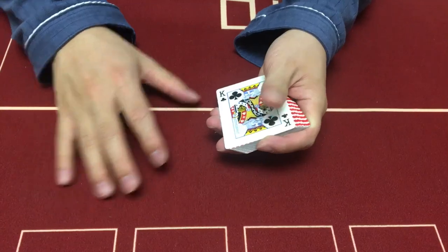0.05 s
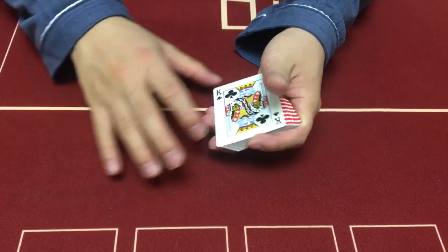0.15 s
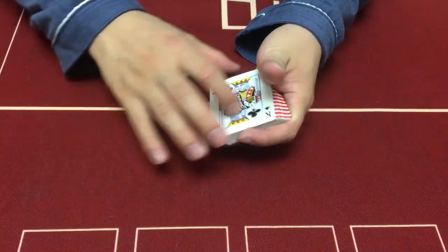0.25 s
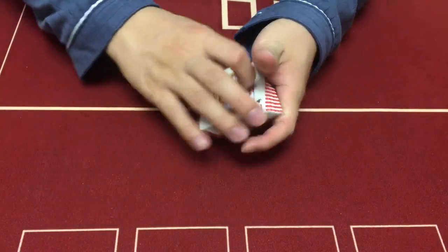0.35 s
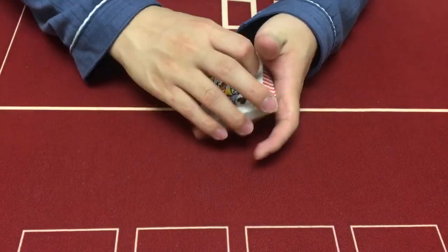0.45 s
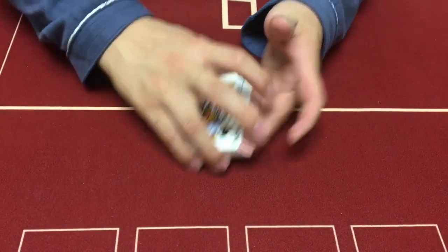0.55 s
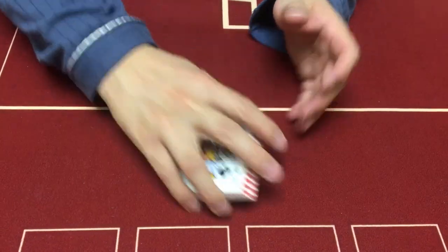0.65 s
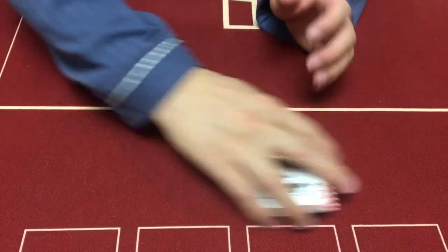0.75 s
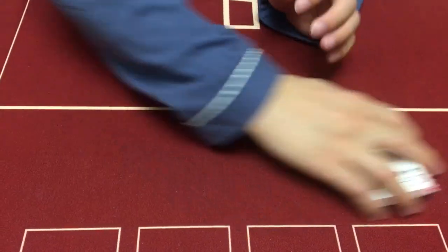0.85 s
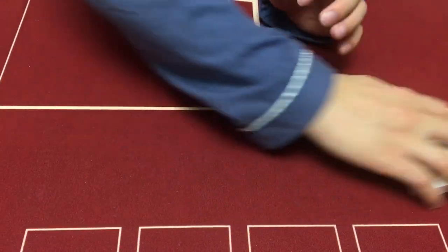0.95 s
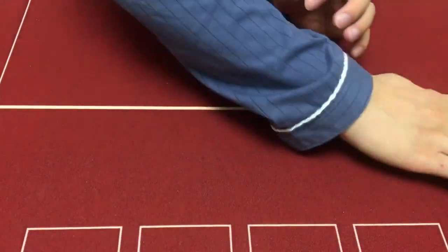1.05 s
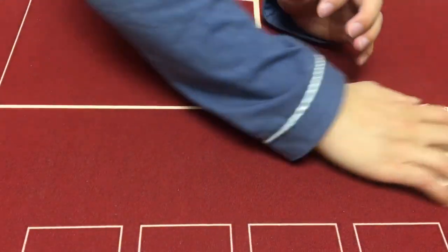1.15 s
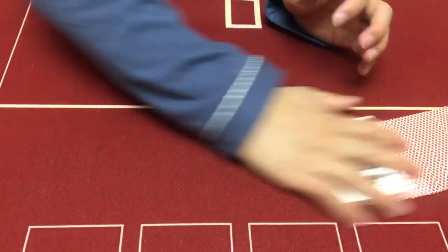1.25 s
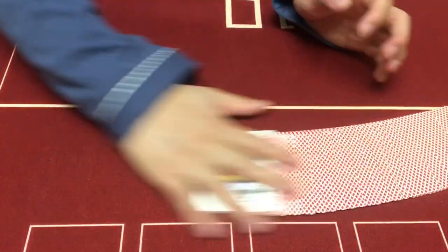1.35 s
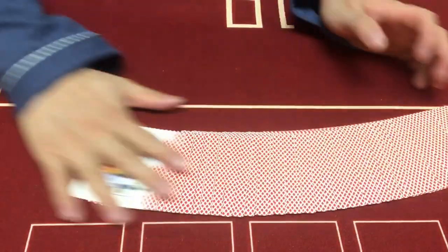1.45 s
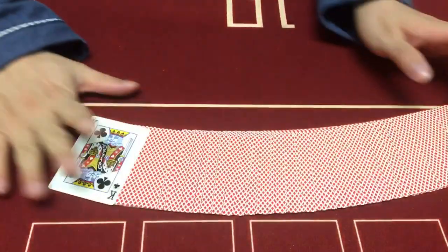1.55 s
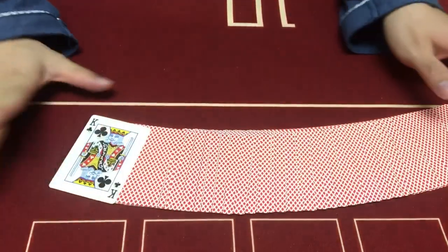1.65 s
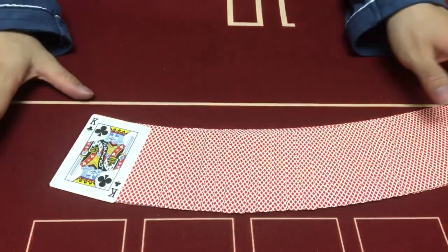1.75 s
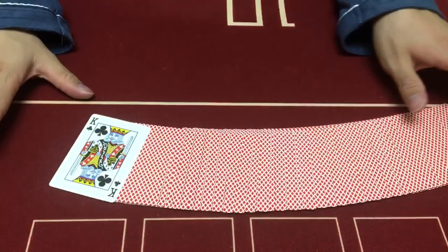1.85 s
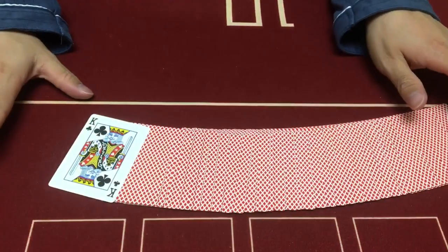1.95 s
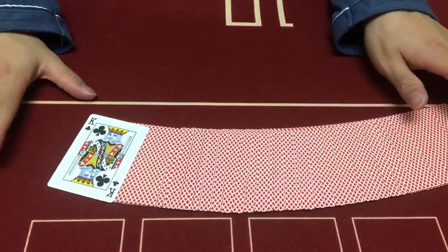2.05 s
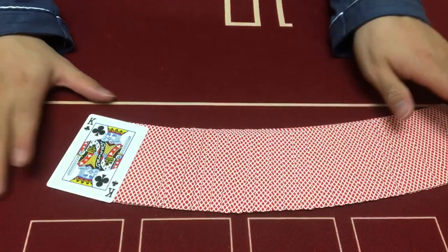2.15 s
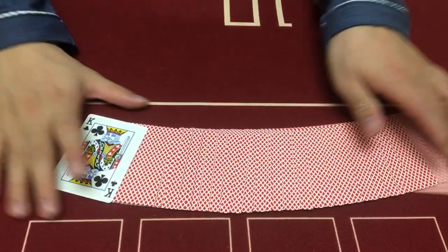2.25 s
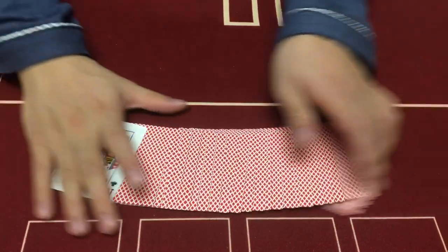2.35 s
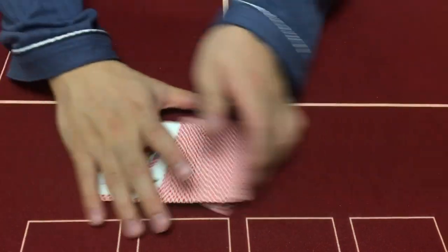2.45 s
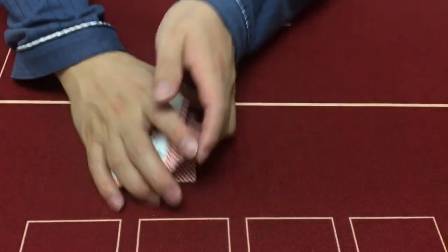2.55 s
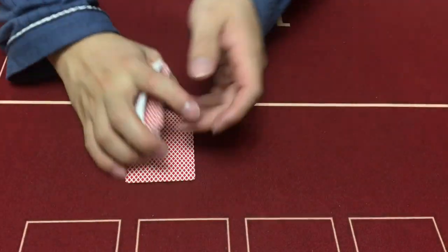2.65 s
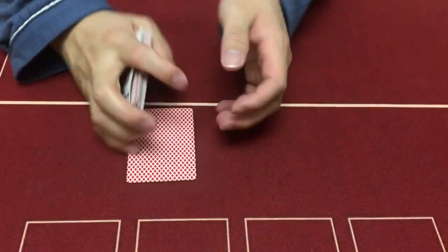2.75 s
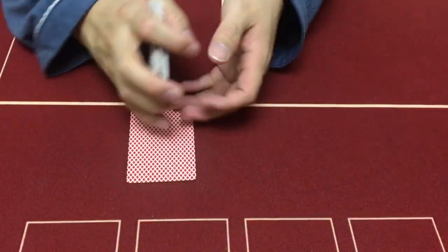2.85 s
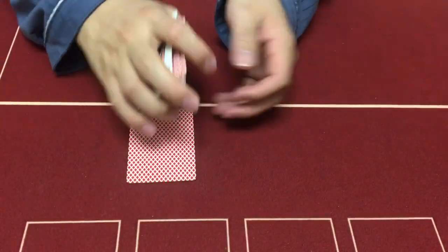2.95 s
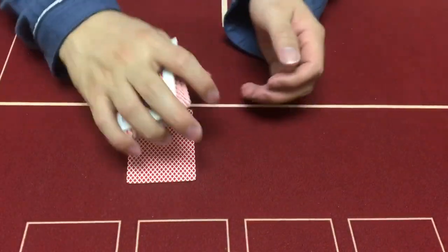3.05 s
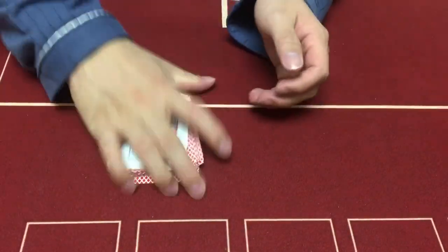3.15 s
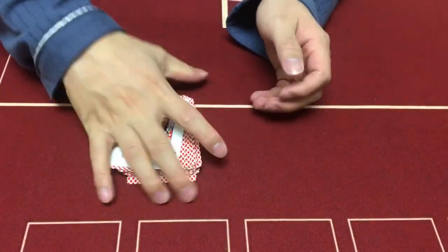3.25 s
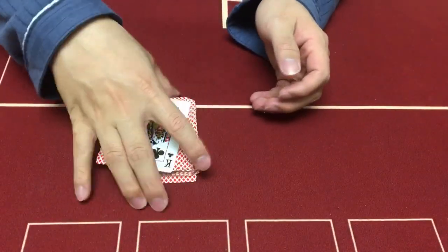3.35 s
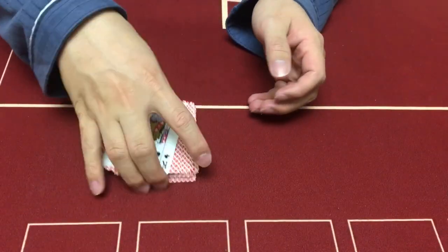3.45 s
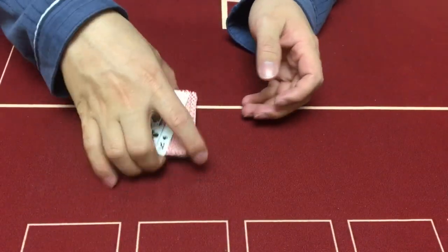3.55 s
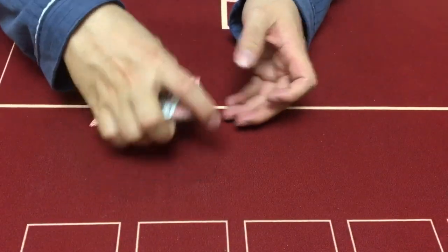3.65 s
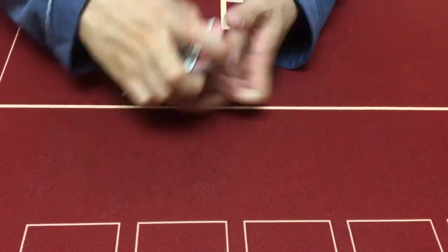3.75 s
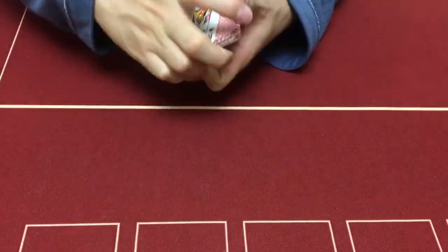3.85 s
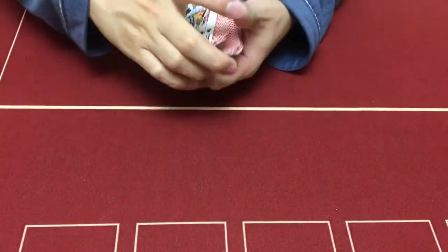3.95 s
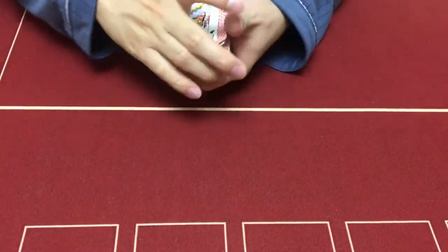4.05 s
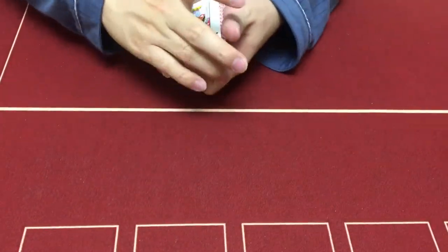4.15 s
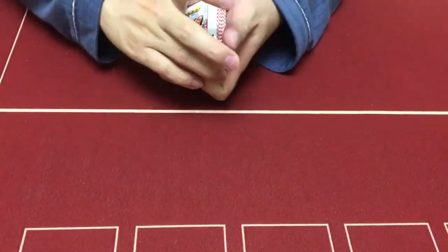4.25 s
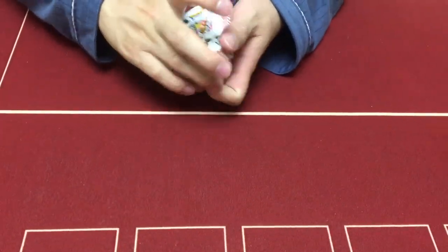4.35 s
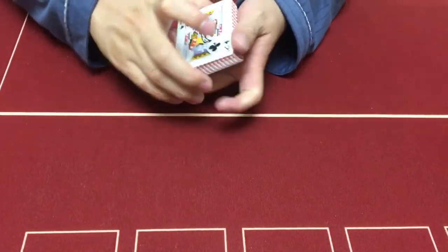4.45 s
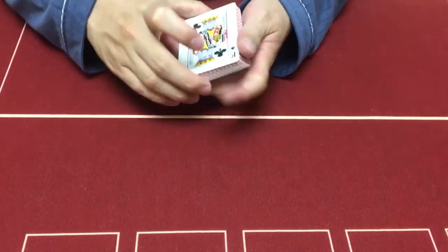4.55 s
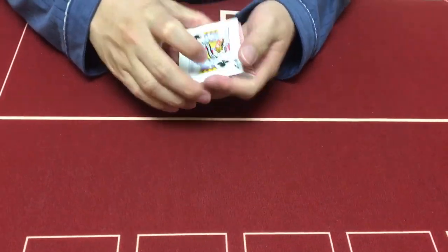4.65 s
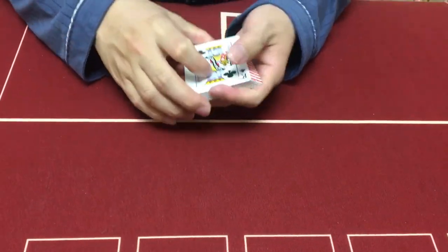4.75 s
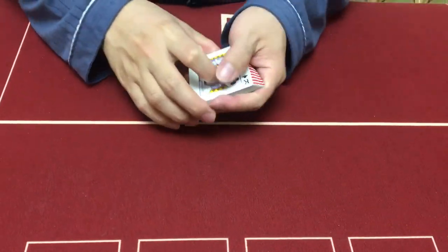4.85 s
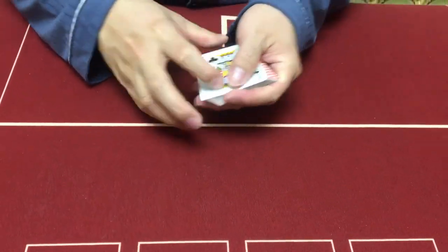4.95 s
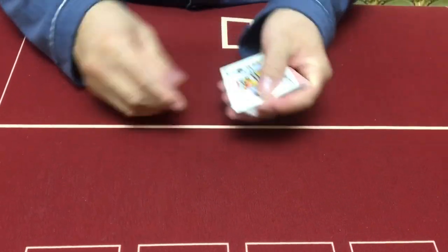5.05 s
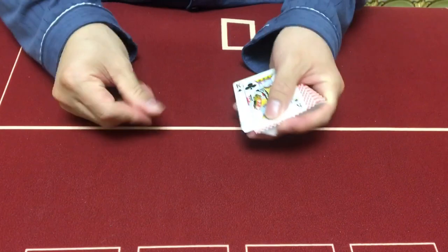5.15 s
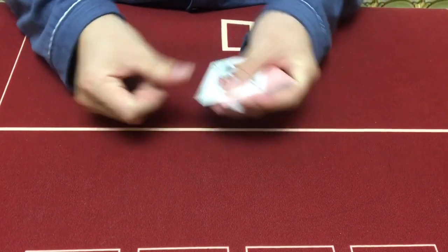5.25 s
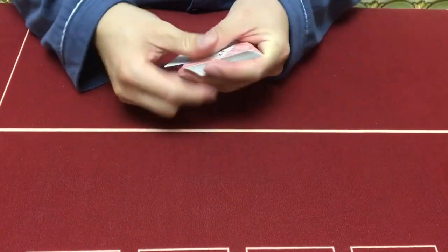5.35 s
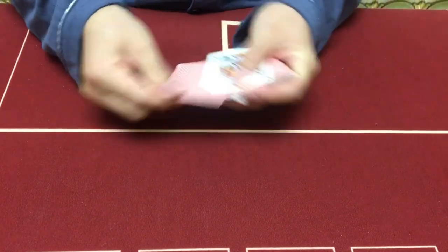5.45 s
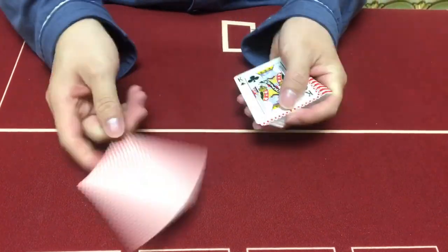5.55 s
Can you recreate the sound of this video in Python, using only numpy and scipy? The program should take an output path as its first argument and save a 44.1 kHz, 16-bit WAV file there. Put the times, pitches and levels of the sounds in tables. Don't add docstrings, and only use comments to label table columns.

```python
import sys
import numpy as np
from scipy import signal
from scipy.fft import rfft, irfft, next_fast_len
from scipy.io import wavfile
from scipy.ndimage import uniform_filter1d, map_coordinates

SR = 44100
rng = np.random.default_rng(int(sys.argv[2]) if len(sys.argv) > 2 else 0)


def inscribe(sig):
    pcm = np.round(np.clip(np.atleast_2d(sig).T, -1, 1) * 32767)
    wavfile.write(sys.argv[1], SR, pcm.astype(np.int16))


def boost(x):
    u = np.asarray(x, float) / 20
    return 10 ** u


N = 247401
TOP_HZ = 15800

# (frequency [Hz], density [dB per Hz])
FLOOR_COLOUR = [(59, -27), (100, -1), (193, -5.5), (266, -9.5), (547, -23.5), (736, -21), (854, -23),
                (2470, -29.5), (2630, -30.5), (2800, -27), (4290, -35.5), (9410, -36), (16000, -44.5)]
# (frequency [Hz], level [dB])
RUMBLE_COLOUR = [(20, -49.5), (32, -19), (42, -3), (55, -0.5), (75, -5.5), (100, -16.5), (140, -30.5),
                 (300, -58.5)]
# (time [s], level [dB])
RUMBLE_LEVEL = [(0, -60.5), (.4, -57), (.8, -53.5), (1.2, -58.5), (1.6, -58.5), (1.9, -60.5), (2.3, -57),
                (2.7, -60), (3.1, -56), (3.5, -59.5), (3.8, -55.5), (4.2, -56.5), (4.7, -57), (5.1, -56),
                (5.61, -55)]
# (frequency [Hz], level [dB])
TYRE_COLOUR = [(400, -29), (620, -9.5), (750, -1), (880, -10), (1300, -22), (2500, -36.5)]
# (time [s], half width [s], level [dB])
CAR_PASSES = [(.5, 0.082, -72.5), (1.3, 0.098, -75), (2.3, 0.31, -67.5), (2.92, 0.16, -68.5),
              (4.52, 0.27, -66), (5.3, 0.15, -77)]
# (start [s], end [s], pitch [Hz], width [Hz], level [dB])
FAINT_TONES = [(4.03, 4.32, 200, 6.2, -62.5), (2.5, 2.03, 1800, 12, -80), (4.38, 4.44, 8500, 830, -71),
               (3.645, 3.69, 4560, 870, -59.5), (3.082, 3.096, 1500, 190, -59),
               (1.185, 1.215, 1400, 450, -64), (1.3, 1.34, 1150, 360, -58.5), (1.47, 1.53, 1600, 350, -68),
               (4.06, 4.075, 6500, 3000, -64.5), (3.77, 3.93, 1900, 500, -70.5)]
# (frequency [Hz], t60 [s])
ROOM_T60 = [(100, .4), (500, .4), (1500, 0.5), (3000, 0.42), (6000, 0.48), (12000, .36)]
# (frequency [Hz], level [dB])
HANDS_IN_ROOM = [(100, 9.5), (400, 8), (2500, 2), (5000, -5.5), (12000, -9)]
# (frequency [Hz], density [dB per Hz])
SLAP_IN_ROOM = [(71, -51), (120, -18), (199, -0.5), (304, -5), (336, -12), (387, -1.5), (524, -3.5),
                (710, -8), (1020, -14), (1230, -23.5), (1600, -10.5), (2250, -13), (2920, -16), (5000, -29),
                (15000, -40)]
# (delay [s], level [dB])
WALL_ECHOES = [(.0125, -29), (.018, -25.5), (0.027, -27), (.036, -26)]
# (time [s], peak [dB], ring pitch [Hz], ring level [dB])
EDGE_TICKS = [(0.2344, -54, 3350, -10), (0.2738, -43, 1580, -3.5), (0.3376, -48, 1950, -1),
              (0.4199, -50.5, 2350, -4), (0.4943, -51.5, 1240, -4), (0.99, -58, 1500, 3),
              (1.0335, -62, 1760, 4), (1.0525, -60.5, 1640, 11), (3.0091, -52.5, 3130, 3.5),
              (3.0619, -42.5, 4068, -7), (3.074, -46, 3220, -18), (3.3996, -52, 980, 4),
              (3.754, -45, 1330, -6.5), (3.7618, -30.5, 4190, -7), (3.7621, -57.5, 800, 9),
              (3.8721, -33, 7070, 4.5), (3.8834, -48, 1760, -9), (3.91, -50.5, 2500, -7),
              (4.0397, -62, 3430, -5.5), (4.0642, -47.5, 3730, 1), (4.388, -54, 8500, -3),
              (4.5765, -59, 1790, 5.5), (4.6763, -42.5, 3400, -5.5), (4.8374, -51, 7500, -16),
              (4.8893, -57.5, 1172, 2.5), (5.2196, -60, 3820, -7.5), (5.3178, -45.5, 850, -3.5),
              (5.4454, -45, 2400, -0.5), (5.5573, -50, 3920, 2)]
# (frequency [Hz], level [dB])
GLAZE_COLOUR = [(1500, -21.5), (3000, -15), (6000, -4), (9000, 1), (12000, 0), (14000, 2), (15800, 0),
                (17000, -18)]
# (frequency [Hz], level [dB])
FELT_COLOUR = [(1500, -20.5), (2600, -12.5), (3300, -1.5), (4000, -0.5), (4700, -3.5), (6500, -6.5),
               (7700, -13), (12000, -19), (16000, -52.5)]
# (frequency [Hz], level [dB])
CUP_COLOUR = [(500, -19), (900, -6.5), (1300, -3.5), (1900, -4), (2500, -1), (4000, -32.5)]
# (start [s], end [s], first pressure [dB], last pressure [dB], card on card over felt [dB])
HAND_BRUSHES = [(0.0, 0.048, -70, -75, -3), (0.102, 0.417, -74.5, -71.5, -3.5), (0.456, 0.57, -66, -70, 0),
                (.62, 0.713, -71.5, -67.5, -5), (0.731, .99, -61.5, -67.5, -3.5),
                (1.492, 1.707, -61.5, -62.5, -8.5), (2.528, 2.696, -57.5, -69.5, -6.5),
                (2.767, 2.77, -66.5, -69, -9), (2.837, 2.852, -68.5, -71, -7),
                (2.975, 3.013, -71, -69, -13), (3.071, 3.084, -60, -65, -6), (3.34, 3.471, -65.5, -67, -3),
                (3.508, 3.555, -69, -65.5, -2), (3.597, 3.668, -69, -64, -0.5),
                (3.821, 3.847, -62.5, -64, 6.5), (3.887, 4.07, -71, -72.5, -2), (4.24, 4.3, -75, -74.5, .1),
                (4.39, 4.435, -80, -80.5, 9.5), (4.554, 4.619, -75, -77.5, -10),
                (4.863, 4.9, -76, -68.5, -3), (5.037, 5.037, -72, -71, 3.5), (5.079, 5.163, -70, -70, 1.7),
                (5.227, 5.246, -63, -73.5, -6), (5.506, 5.603, -71.5, -64.5, -5)]
# (time [s], pressure [dB], card on card over felt [dB], hand cupping [dB])
LONG_GESTURES = [
    [(1.03, -83, -10, 0.1), (1.052, -67, -8, 5), (1.094, -58.5, -2.5, -3), (1.16, -61, 3.5, 6),
     (1.292, -50.5, 4.5, -1.5), (1.4, -54, 6, -5), (1.416, -54, 8.5, -2), (1.488, -62, -9, 5.5),
     (1.5, -70, -3, 3)],
    [(1.9, -89, 1, 3), (1.95, -75, -13, 8), (1.982, -70, -7, 5), (2.018, -63.5, -11, -2.5),
     (2.14, -58.5, -3, -4.7), (2.382, -54.5, -2.5, 4.3), (2.452, -51.5, -2, 1), (2.48, -67, -2, -4),
     (2.5, -68, -2, 0.1)],
]
# (time [s], pressure [dB], card on card over felt [dB], hand cupping [dB])
CARD_DRAW = [(5.33, -73, 5, -4), (5.34, -69, -1, -3), (5.351, -53, 3, 3), (5.39, -54, 7.5, 0.5),
             (5.41, -53.5, 11, 1), (5.438, -53, 6.5, 6), (5.45, -66, 3, 3), (5.48, -75, 5, .1)]
# (time [s], blow [dB], contact time [ms], crack [dB])
SLAP_CONTACTS = [
    (3.1050, -30, 0.063, -29.5),
    (3.1069, -17, 0.27, -46.5),
    (3.1091, -16.5, .069, -22.5),
    (3.1102, -3.5, 0.069, -25),
    (3.1115, -10, .295, -34),
    (3.115, -24.5, 0.3, -39.5),
]
# (frequency [Hz], level [dB], t60 [s])
TABLE_MODES = [(82, -11, 0.11), (196, -11, 0.11), (373, -10.5, 0.028), (533, -16, .05), (700, -6.5, .02),
               (965, -4.5, .016), (1600, -1, 0.011), (2000, -13, 0.011), (2350, -8, 0.0054),
               (3130, 2.5, 0.0069), (4200, -11, .009), (5680, -2.5, .01), (6790, -14, .004),
               (9270, -13, .004)]
# (centre [Hz], width [Hz], depth [dB])
PORT_DIPS = [(7800, 1500, -2), (10400, 510, -5), (4900, 250, -3)]


def unit(x):
    return x / np.sqrt(np.mean(x ** 2) + 1e-20)


def along(points, hz):
    f, v = np.transpose(points)
    return np.interp(np.log(hz + 1), np.log(f + 1), v)


def curves(rows):
    s, *cols = np.transpose(rows)
    return [np.interp(np.arange(N) / SR, s, c, left=-150, right=-150) for c in cols]


def wobble(rate_hz):
    knots = rng.standard_normal(int(N * rate_hz / SR) + 4)
    return map_coordinates(knots, [np.arange(N) * rate_hz / SR])


def coloured(x, spectrum):
    m = next_fast_len(N + 8192)
    hz = np.fft.rfftfreq(m, 1 / SR)
    gain = boost(along(spectrum, hz)) * (hz < TOP_HZ)
    return unit(irfft(rfft(x, m) * gain, m)[:N])


def scrape(spectrum, grit_db, patchy_db):
    slips = rng.standard_normal(N) * boost(grit_db * wobble(900))
    z = signal.stft(slips, nperseg=256)[2]
    flecks = uniform_filter1d(rng.standard_normal(z.shape), size=2, axis=0)
    flecks = uniform_filter1d(flecks, size=3, axis=1)
    patches = uniform_filter1d(uniform_filter1d(flecks, size=6, axis=0), size=10, axis=1)
    gain = boost(patchy_db * (unit(patches) + unit(flecks)))
    return coloured(signal.istft(z * gain, nperseg=256)[1][:N], spectrum)


def background():
    still = boost(-61) * scrape(FLOOR_COLOUR, grit_db=0.6, patchy_db=0.96)
    drone = signal.hilbert(coloured(rng.standard_normal(N), RUMBLE_COLOUR))
    steadied = drone.real / np.abs(drone) ** .7
    drone = coloured(steadied, [(30, -12.5), (45, -2), (90, 1.0), (140, -18.5), (300, -50)])
    sway = boost(curves(RUMBLE_LEVEL)[0] + 1.6 * wobble(7.6))
    t = np.arange(N) / SR
    road = sum(boost(db) * np.exp(-((t - s) / half_s) ** 2) for s, half_s, db in CAR_PASSES)
    return still + sway * drone + road * scrape(TYRE_COLOUR, grit_db=4.0, patchy_db=0.7)


def tones():
    t, out = np.arange(N) / SR, np.zeros(N)
    for t0, t1, hz, width, db in FAINT_TONES:
        swell = np.sin(np.pi * np.clip((t - t0) / (t1 - t0), 0, 1)) ** .6
        band = [(hz - 2 * width, -50), (hz - width / 2, 0), (hz + width / 2, 0), (hz + 2 * width, -50)]
        out += boost(db) * swell * coloured(rng.standard_normal(N), band)
    return out


def room(x, colour):
    hz, t, z = signal.stft(rng.standard_normal(SR // 2), SR, nperseg=256)
    decay_db = along(colour, hz)[:, None] - 60 * t / along(ROOM_T60, hz)[:, None]
    tail = signal.istft(z * boost(decay_db), SR, nperseg=256)[1]
    tail = tail * (1 - np.exp(-np.arange(len(tail)) / SR / .006))
    return signal.fftconvolve(np.pad(x, (200, 0)), tail / np.linalg.norm(tail))[:N]


def echoes(x):
    t = np.arange(SR // 10) / SR
    smear = sum(boost(db - 60 * np.abs(t - s) / 0.0065) * (t > s) for s, db in WALL_ECHOES)
    smear = smear * rng.standard_normal(len(t))
    smear = signal.lfilter([.4], [1, -.6], smear)
    return signal.fftconvolve(x, smear)[:N]


def ticks():
    out, t = np.zeros(N + SR), np.arange(SR // 20) / SR
    noises = rng.standard_normal((len(EDGE_TICKS), len(t)))
    for (s, db, hz, ring_db), noise in zip(EDGE_TICKS, noises):
        top_hz = np.clip(6000 * boost(.45 * (db + 55.5)), 1.4 * hz, 15000)
        edge = signal.butter(2, [.4 * hz, top_hz], "band", fs=SR)
        snap = signal.lfilter(*edge, noise * (boost(-60 * t / 0.0047) + 0.137 * boost(-60 * t / 0.03)))
        ring_t60_s = .011 / (hz / 2000) ** .4
        ring = np.sin(2 * np.pi * hz * t) * boost(ring_db - 60 * t / ring_t60_s)
        tap = np.sin(2 * np.pi * 520 * t) * boost(-14 - 60 * t / 0.0075)
        out[round((s + .0008) * SR):][:len(t)] += boost(db) * (snap + ring + tap)
    return out[:N]


def pressure():
    touch_db_per_s, lift_db_per_s = 499, 350.5
    t, power = np.arange(N) / SR, np.zeros((3, N))
    moves = [curves(rows) for rows in LONG_GESTURES + [CARD_DRAW]]
    for t0, t1, first_db, last_db, gloss_db in HAND_BRUSHES:
        away_db = touch_db_per_s * np.maximum(t0 - t, 0) + lift_db_per_s * np.maximum(t - t1, 0)
        moves.append((np.interp(t, [t0, t1], [first_db, last_db]) - away_db, gloss_db, 0))
    for level_db, gloss_db, cup_db in moves:
        hollow_db = -67.5 + cup_db + 0.9 * (level_db + 59)
        power = power + boost(2 * np.array([level_db, level_db + gloss_db, hollow_db]))
    return np.sqrt(power)


def rubbing():
    on_felt, on_cards, cupped = pressure()
    flutter = wobble(70)
    card_gain = on_cards * boost(0.8 * flutter + 0.58 * wobble(25))
    cards = card_gain * scrape(GLAZE_COLOUR, grit_db=-1.2, patchy_db=0.3)
    felt_gain = on_felt * boost(0.75 * flutter + 0.4 * wobble(25))
    felt = felt_gain * scrape(FELT_COLOUR, grit_db=0.0, patchy_db=1.03)
    cup_gain = cupped * boost(0.54 * flutter + 1.4 * wobble(15))
    cup = cup_gain * scrape(CUP_COLOUR, grit_db=1.3, patchy_db=1.6)
    return cards + felt + cup


def slap():
    t = np.arange(N) / SR
    push = -sum(boost(db) * np.exp(-((t - s) * 1000 / ms) ** 2 * 2) / ms for s, db, ms, _ in SLAP_CONTACTS)
    push = signal.lfilter(*signal.butter(2, 420, "high", fs=SR), push)
    burst = sum(boost(db - 60 * np.abs(t - s) / 0.012) * (t > s) for s, _, _, db in SLAP_CONTACTS)
    u = t[:SR // 2]
    body = sum(boost(db - 60 * u / t60_s) * np.cos(2 * np.pi * hz * u - .25) for hz, db, t60_s in TABLE_MODES)
    crack = signal.lfilter([.45], [1, -.65], rng.standard_normal(N))
    blow = boost(-40.5) * signal.fftconvolve(push, body)[:N] + burst * crack
    mirror_s, mirror_db = .00041, -6.5
    return blow + boost(mirror_db) * np.roll(blow, round(mirror_s * SR))


def scene():
    blow, hands = slap(), rubbing() + ticks()
    bang = signal.unit_impulse(N, round(SLAP_CONTACTS[3][0] * SR))
    near = blow + boost(-10.0) * echoes(blow) + hands
    far = boost(-5.0) * room(bang, SLAP_IN_ROOM) + boost(-13.5) * room(hands, HANDS_IN_ROOM)
    return (near + far + background() + tones())[None]


def top_cut(x):
    return signal.sosfilt(signal.butter(12, 16500, fs=SR, output="sos"), x)


def record(dry):
    headroom, knee, steep_hz = .85, 3, 16400
    hz = np.fft.rfftfreq(N, 1 / SR)
    port_db = sum(db * np.exp(-((hz - centre) / width) ** 2) for centre, width, db in PORT_DIPS)
    held = dry / (1 + np.abs(dry / headroom) ** knee) ** (1 / knee)
    mix = irfft(rfft(held) * boost(port_db) * (hz < steep_hz), N)
    return top_cut(mix)


dry = scene()
out = record(dry)
inscribe(out)
```